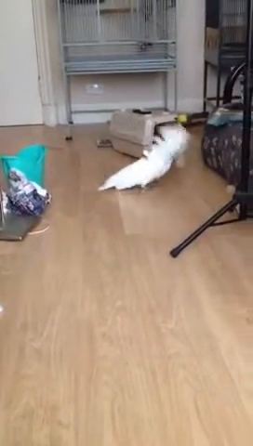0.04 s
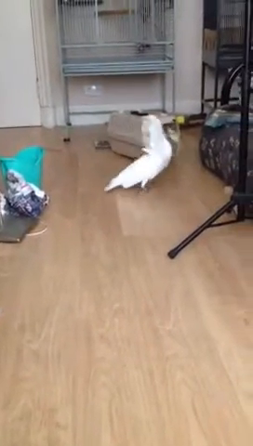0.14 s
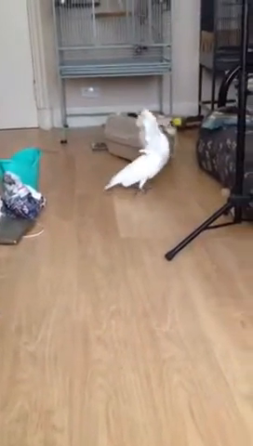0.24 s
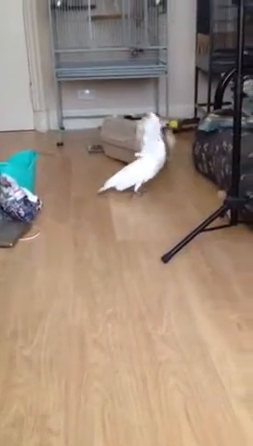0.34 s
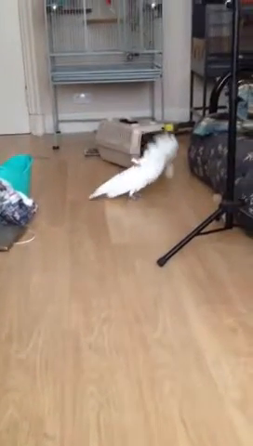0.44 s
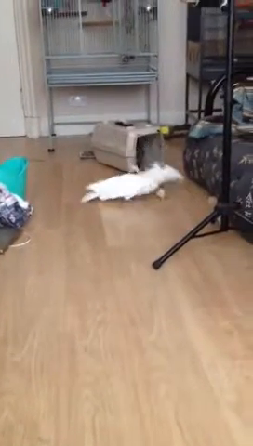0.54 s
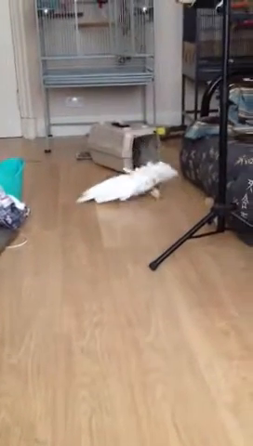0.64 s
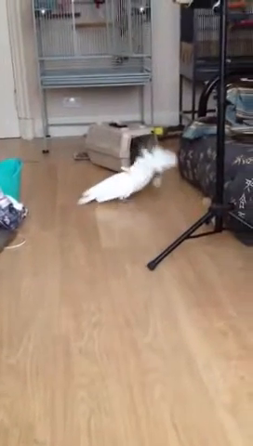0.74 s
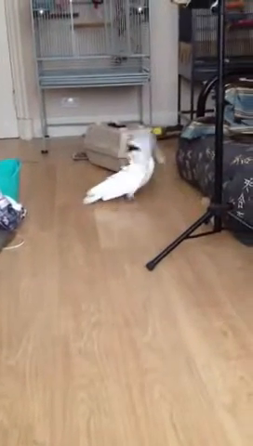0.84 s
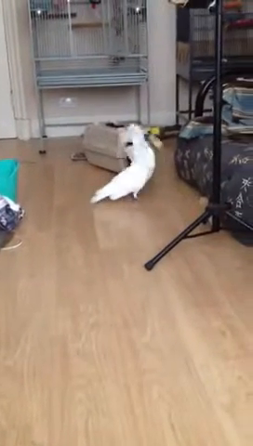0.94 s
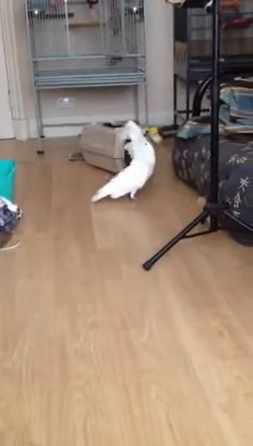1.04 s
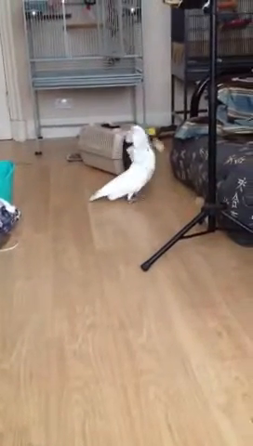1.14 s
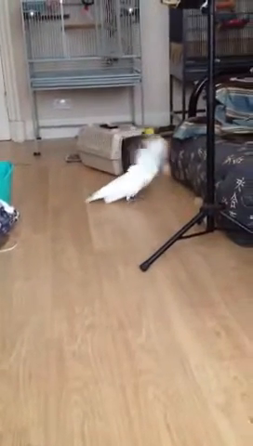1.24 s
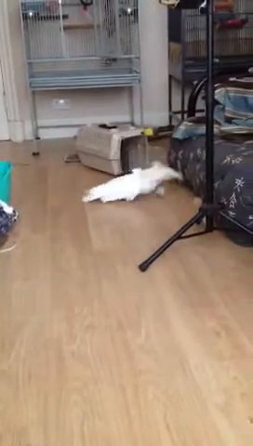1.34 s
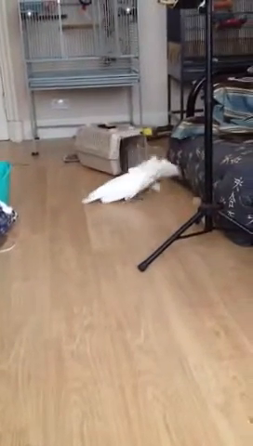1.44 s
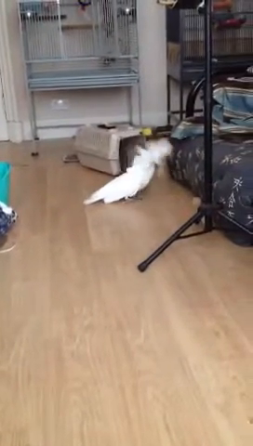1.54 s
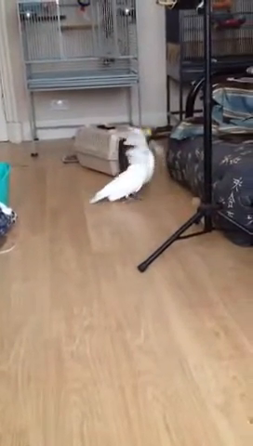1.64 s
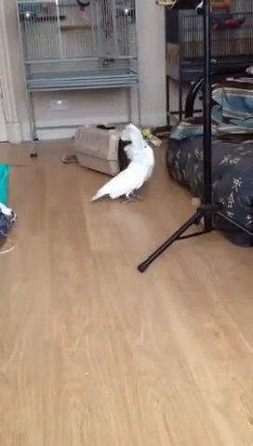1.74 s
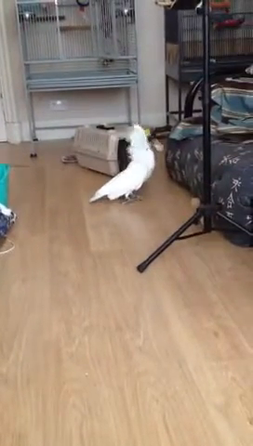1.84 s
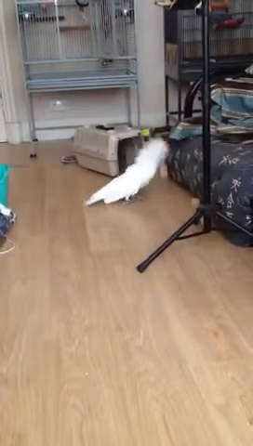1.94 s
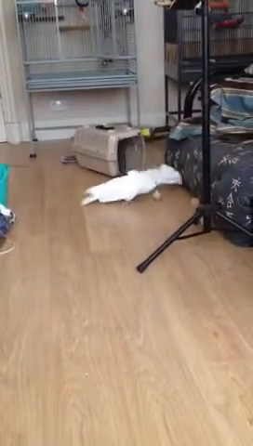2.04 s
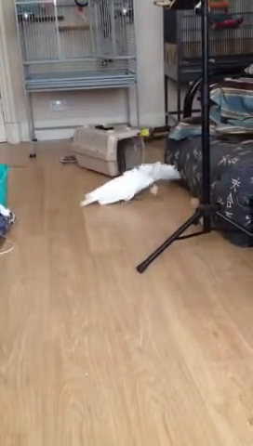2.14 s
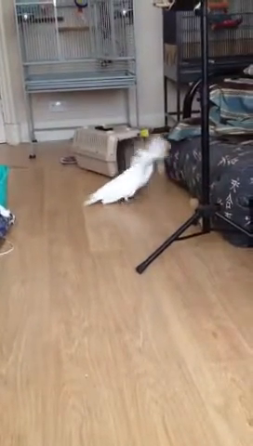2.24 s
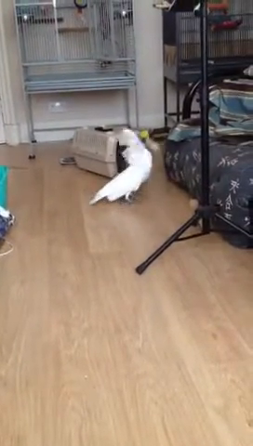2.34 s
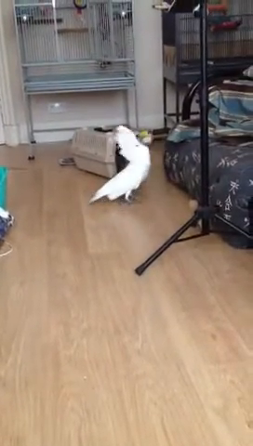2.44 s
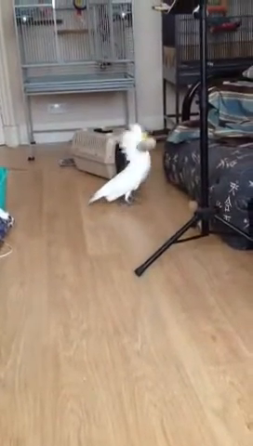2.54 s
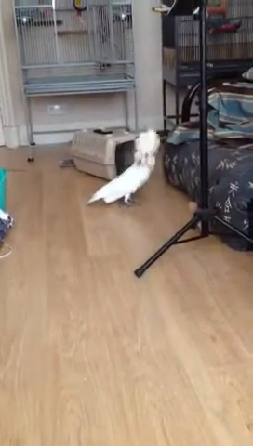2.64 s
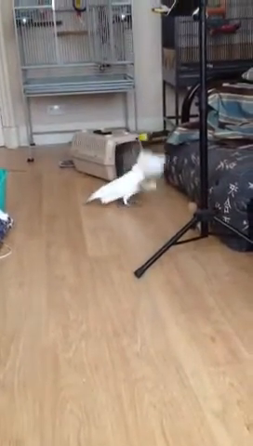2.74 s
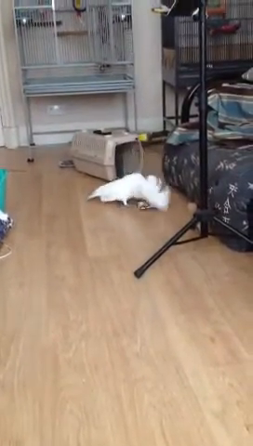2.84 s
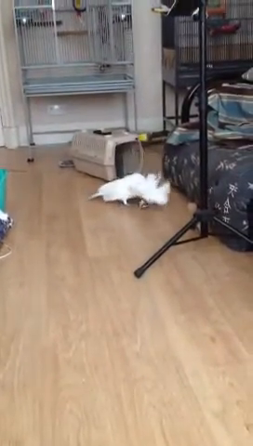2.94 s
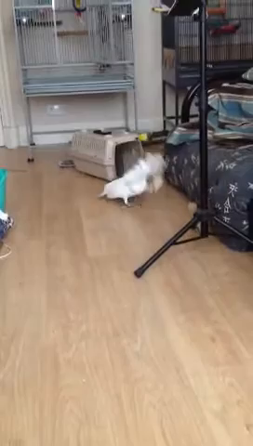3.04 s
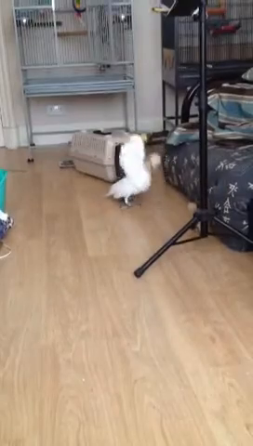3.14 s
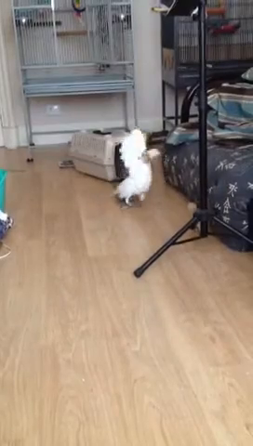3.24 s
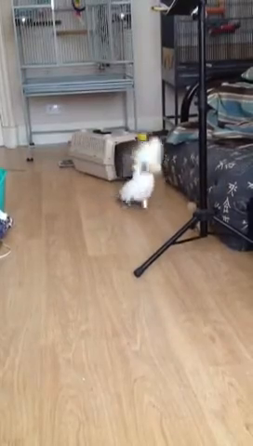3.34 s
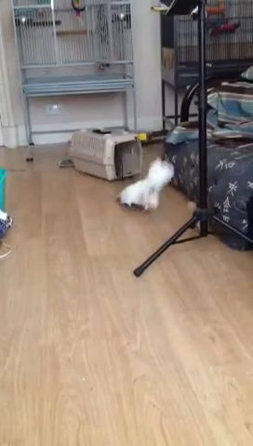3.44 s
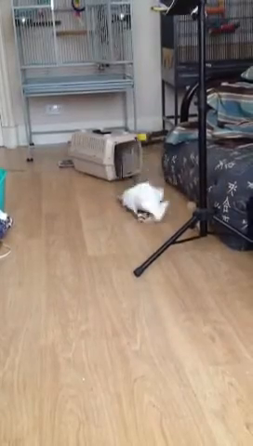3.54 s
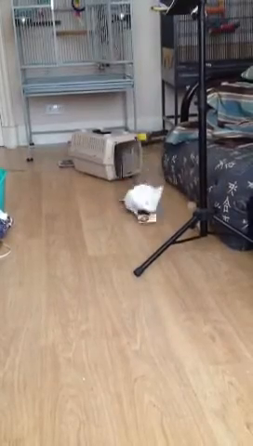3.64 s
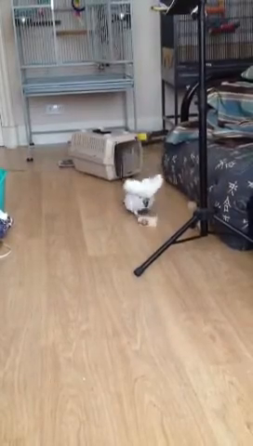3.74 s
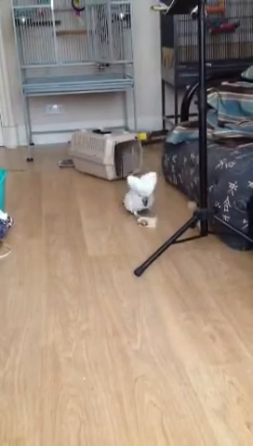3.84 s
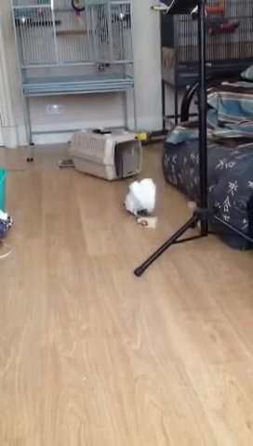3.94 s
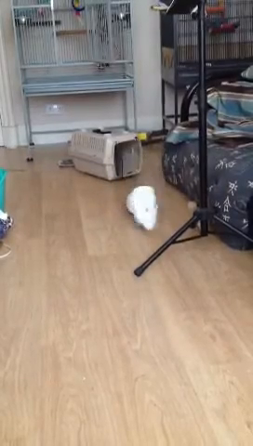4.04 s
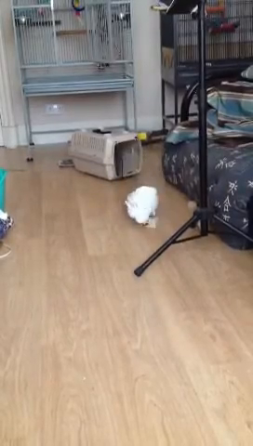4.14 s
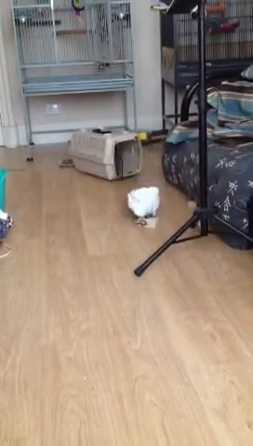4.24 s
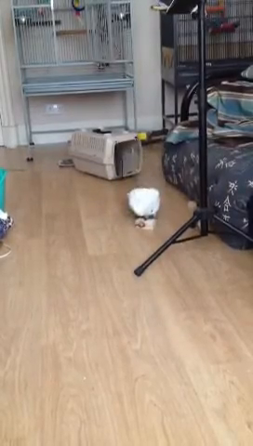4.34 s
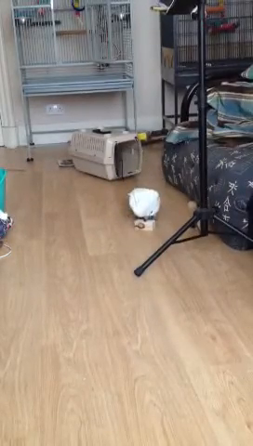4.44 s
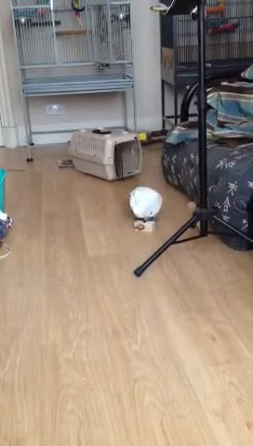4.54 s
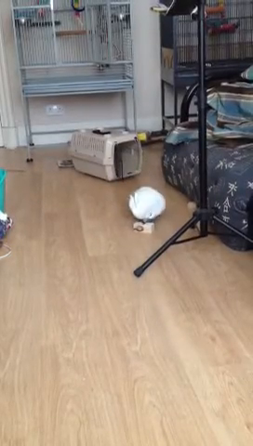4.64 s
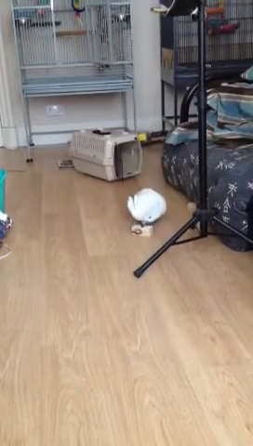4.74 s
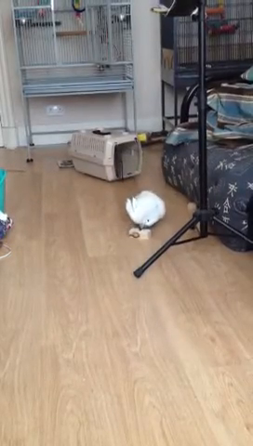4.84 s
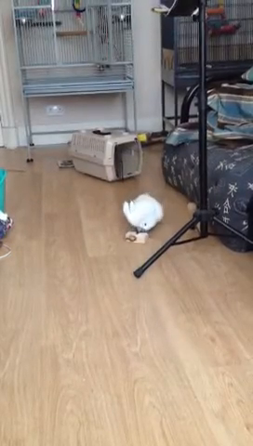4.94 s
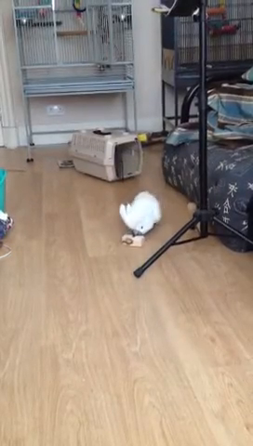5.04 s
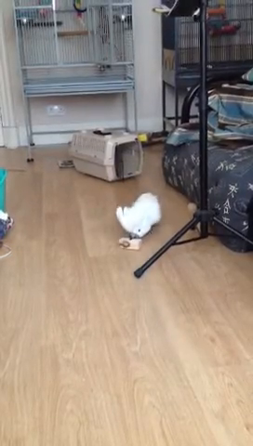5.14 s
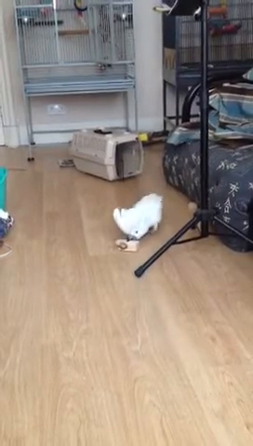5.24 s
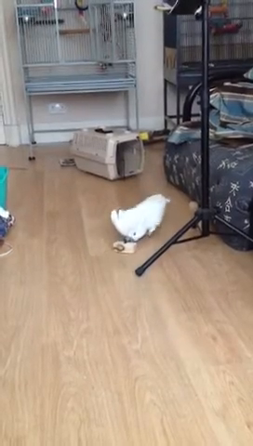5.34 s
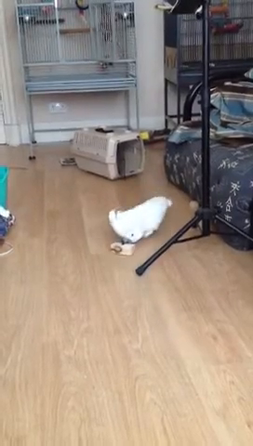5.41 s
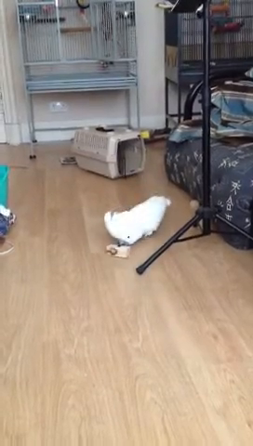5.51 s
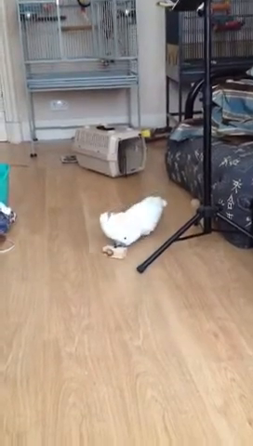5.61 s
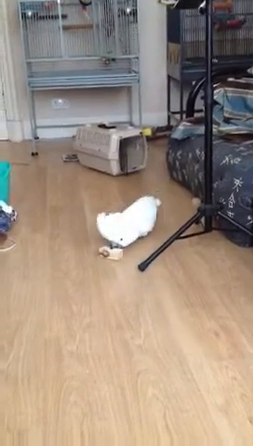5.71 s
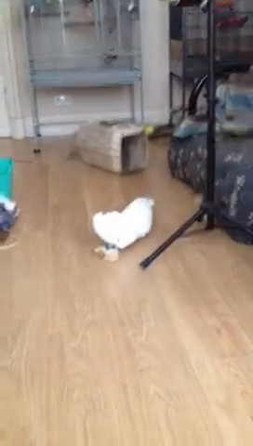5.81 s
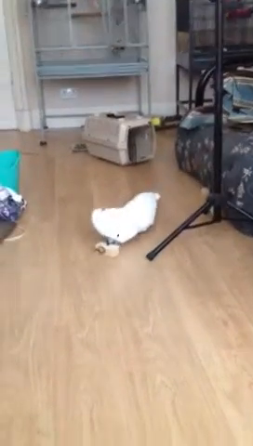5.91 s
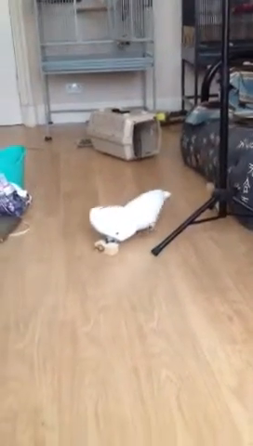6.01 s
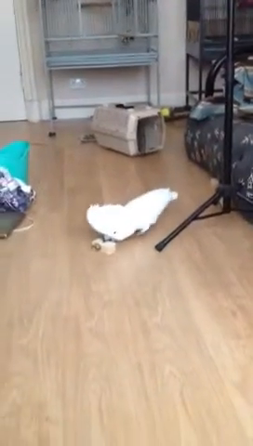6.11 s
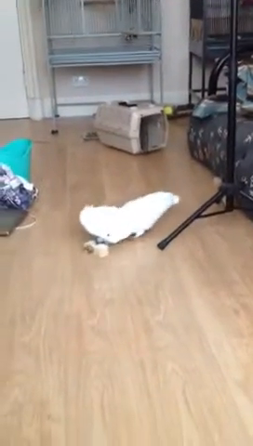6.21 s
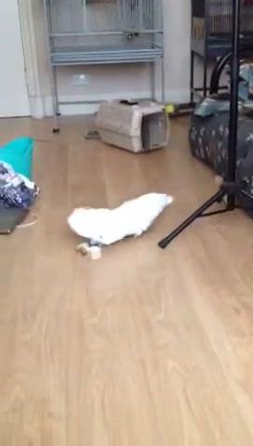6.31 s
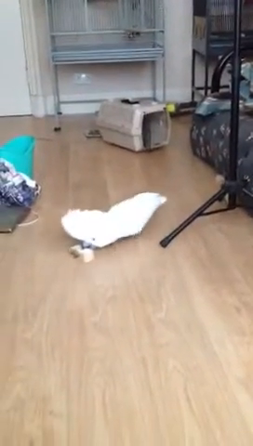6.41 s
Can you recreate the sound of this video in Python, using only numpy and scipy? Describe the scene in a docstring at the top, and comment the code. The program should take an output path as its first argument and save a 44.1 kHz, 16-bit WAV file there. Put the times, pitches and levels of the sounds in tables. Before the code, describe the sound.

A cockatoo bangs a wooden block on a wooden floor in hard spaced knocks, then soft squeals, faint whistles, scuffs and a low scraping rumble.

```python
"""Hard wooden knocks, six blows and then a tumble: a cockatoo bangs a toy block on a wooden floor, a few metres off.
Block and boards ring as damped resonances, with a noise crack that grows with the hardness of the contact.
Scuffs and ticks of claws and feathers (noise) run throughout; after the blows come soft squeals and whistles
(noise-modulated gliding tones), a soft foot thump, and low rumbles on the boards (stick-slip friction): a footfall,
then the block pushed along. A live room answers over a faint room tone."""
import sys
import numpy as np
from scipy import signal
from scipy.fft import rfft, irfft, next_fast_len
from scipy.io import wavfile
from scipy.ndimage import uniform_filter1d, map_coordinates

SR = 44100
rng = np.random.default_rng(int(sys.argv[2]) if len(sys.argv) > 2 else 0)


def file_out(sig):
    """Save sig as 16-bit WAV at sys.argv[1]."""
    # one column per channel
    cols = np.atleast_2d(sig).T
    # limit, then scale
    lim = np.clip(cols, -1, 1)
    pcm = np.round(lim * 32767).astype(np.int16)
    wavfile.write(sys.argv[1], SR, pcm)


N = 285327
TIME = np.arange(N) / SR

# Block meets floor, often edge first and face just after; the last row is a soft foot thump:
# (time [s], block ring gain [dB], floor thump gain [dB], contact corner [Hz], band favoured by the struck spot [Hz])
KNOCKS = [(0.002, 4, 3, 1590, 685), (0.519, 23.5, 19, 4180, 1192), (0.5227, 20, 16, 4370, 950),
          (1.3244, 22.5, 29, 3077, 2260), (2.0262, 21.5, 28, 1729, 914), (2.8453, 11.5, 18.5, 1791, 900),
          (2.8519, 19, 16, 1263, 472), (3.5245, 25.5, 22.5, 1154, 444), (3.5256, 19.5, 20, 4080, 2993),
          (3.7443, 14, 6, 1100, 674), (3.750, 10, 16, 3870, 3990), (3.828, -4.5, -7, 1500, 686),
          (4.044, -1.5, 5, 703.4, 299)]
# Resonances of the block: (frequency [Hz], width [Hz], gain [dB])
BLOCK_MODES = [(435.7, 71, -3.5), (643.2, 65, 4.5), (710.6, 92.3, 2), (845.4, 60, 3.5), (950.4, 23, 1.5),
               (1022.3, 28, 1), (1197.6, 97, 0.5), (1395, 73, -0.5), (1555.6, 53, 1.5), (1791, 99, -0.5),
               (2052, 160, -1.5), (2457, 210, -3), (3009, 240, -6), (3340.4, 130, -5), (3850, 110, -5.5)]
# Resonances of the floorboards: (frequency [Hz], width [Hz], gain [dB])
BOARD_MODES = [(112, 12, -29.5), (168.83, 15.38, 2), (216.5, 31, -5), (250.56, 16, 0), (292.9, 16, -1.5),
               (335.35, 20, -3), (370.7, 59, -10.5), (427, 61, -16), (570.1, 24, -8)]
# Colour of the crack of hard contact: (frequency [Hz], gain [dB])
CRACK_COLOUR = [(100, -19), (1000, 1.5), (3000, 3.5), (4400, 2), (5500, -4.5), (7200, -5.5), (9800, -17.5),
                (15000, -21)]
# Squeals that break from a high note to a low one:
# (time of the break [s], high note length [s], high note level before the room [dB], high note rasp [Hz])
SQUEALS = [(4.114, 0.15, -49, 478.5), (4.383, 0.085, -43, 242.4)]
# Gliding whistles: (start [s], length [s], first pitch [Hz], last pitch [Hz], level before the room [dB],
# rasp, half the width of the line [Hz])
WHISTLES = [(4.639, 0.1676, 1993, 4023, -52, 320.7), (4.93, 0.046, 4568, 4830, -57.5, 263.3),
            (5.015, 0.08, 3889, 3594, -51, 99.05), (5.103, 0.0812, 2803, 2737, -55.5, 147.9),
            (5.184, 0.095, 3006, 4400, -48, 300.6), (5.267, 0.12, 4544, 4353, -56.5, 80.8)]
# Low rumbles on the boards, a soft footfall, then the block pushed along:
# (start [s], length [s], level before bass cut and room [dB])
RUMBLES = [(4.294, 0.053, -56), (4.615, 0.821, -64.5), (5.534, 0.92, -53.5), (5.932, 0.301, -52.5)]
# What the rumbles stir: (frequency [Hz], width [Hz], gain [dB])
RUMBLE_MODES = [(174.2, 50, -0.5), (257, 21.4, 1), (316.2, 12, 5.5), (387.6, 35.3, 0.5), (633, 171, -9),
                (1090, 125, -25)]
# A corner of the block hums on the boards: (middle [s], half length [s], peak level before the room [dB])
CORNER_HUMS = [(5.44, 0.1215, -61.5), (6.46, 0.031, -54)]
# Resonances of that corner: (frequency [Hz], width [Hz], gain [dB])
CORNER_MODES = [(654.7, 73, 8), (780, 61, -16), (973, 123, -24.5)]
# Scuffs of claws and feathers: (start [s], length [s], level before filters and room [dB], top edge [Hz])
SCUFFS = [(0.81, 0.075, -41.5, 14100), (1.081, 0.0516, -52, 8960), (3.35, 0.274, -51, 10220),
          (3.924, 0.0477, -45, 11000), (4.648, 0.544, -52, 8830), (4.771, 0.1446, -48.5, 10960),
          (5.204, 0.19, -47.5, 11700), (5.54, 0.0675, -43, 14200), (5.661, 0.1596, -43, 6900),
          (5.933, 0.378, -51, 9860), (6.291, 0.0242, -38, 14000), (6.381, 0.0707, -39.5, 8700)]
# Sharp ticks of beak and claws: (time [s], gain before colouring [dB])
TICKS = [(0.286, -24.5), (0.301, -21), (3.348, -11), (3.361, -11.5), (4.819, -13), (5.231, -14.5),
         (6.032, -11), (6.321, -12.5)]
# Colour of scuffs and ticks: (frequency [Hz], gain [dB])
SCUFF_COLOUR = [(80, -36), (300, -14.5), (1000, -12), (2200, -10.5), (3600, -1.5), (5000, -1.5),
                (8300, -2.5), (9800, -10.5), (15000, -7.5)]
# Colour of the room tone: (frequency [Hz], relative level per Hz [dB])
TONE_COLOUR = [(50, -16.5), (100, -16.5), (160, -0.5), (310, -1.5), (450, -5.5), (1000, -10), (2200, -14.5),
               (4000, -16), (8000, -16.5), (10000, -25), (12500, -19.5), (15000, -17.5)]
# Decay of the room: (frequency [Hz], time to fall by 60 dB [s])
ROOM_T60 = [(150, 0.419), (400, 0.445), (900, 0.4733), (2000, 0.524), (5000, 0.5257), (12000, 0.27)]

SPOT_DB = 5.5  # how much the struck spot favours its band
CLICK_DB = -18  # push of the contact itself, relative to the block's ring gain
THUMP_LAG_S = 0.001502  # the boards give a moment after the contact
# crack relative to the block's ring gain at a middling contact corner, and its gain per octave of harder contact
CRACK_DB, MIDDLING_HZ, CRACK_DB_PER_OCTAVE = -21, 1996.6, 4.5

HIGH_NOTE_HZ, LOW_NOTE_HZ = 4708, 3701
LOW_NOTE_S, LOW_NOTE_DB, LOW_NOTE_RASP_HZ = 0.0653, -47.5, 260.1
SAG_HZ_PER_S = 2526  # average rate at which the low note sinks
NOTE_ATTACK_S, NOTE_RELEASE_S = 0.01545, 0.0276
EFFORT_DB_PER_OCTAVE = 15.5  # a note grows louder as it climbs
FRINGE_DB, FRINGE_WIDTH = -7, 2.6  # hiss around a note: relative level, width in rasp widths

RUMBLE_ATTACK_S, RUMBLE_RELEASE_S = 0.0335, 0.04
# slips a second, unevenness of their spacing (log scale), level against the fine grain
JUDDER_HZ, JUDDER_SCATTER, JUDDER_DB = 63.73, 0.045, -1.5

SCUFF_ATTACK_S, SCUFF_RELEASE_S = 0.032, 0.029
TONE_DB = -66.5


def knocks():
    """Each contact rings block and boards; a flat, soft one leaves out the upper modes and cracks less."""
    out = np.zeros(N)
    blow = signal.unit_impulse(SR)
    # the soft foot thump goes through the same resonances
    for s, block_db, floor_db, contact_hz, spot_hz in KNOCKS:
        block = undb(block_db) * edge(ring(blow, BLOCK_MODES), contact_hz, "low", order=3)
        # the spot that lands favours the modes that swing most there
        spot_mode = [(spot_hz, 0.24 * spot_hz, 0)]
        block = block + (undb(SPOT_DB) - 1) * ring(block, spot_mode)

        hardness_octaves = np.log2(contact_hz / MIDDLING_HZ)
        crack_db = block_db + CRACK_DB + CRACK_DB_PER_OCTAVE * hardness_octaves
        crack = undb(crack_db) * colour(snap(burst_db=-7, decay_s=0.003), CRACK_COLOUR)

        push = edge(blow, 1.104 * contact_hz, "low", order=3)
        click = undb(block_db + CLICK_DB) * edge(push, 1600, "high")
        boards = undb(floor_db) * edge(ring(blow, BOARD_MODES), 900, "low")

        add(out, s, click + crack + room(block, direct_db=-3.5))
        # the boards reach right up to the microphone, so more of their thump arrives directly
        add(out, s + THUMP_LAG_S, room(boards, direct_db=1.5))
    return out


def snap(burst_db, decay_s):
    """A gritty burst of contact noise straight from the spot, with the room's answer to a bare impulse."""
    burst = rng.standard_normal(SR) * np.exp(-TIME[:SR] / decay_s)
    direct = undb(burst_db) * burst / np.linalg.norm(burst)
    return direct + room(signal.unit_impulse(SR), direct_db=-17.5)


def wheeze(air_db=-13, air_hz=7500, air_width_hz=2000):
    """The bird squeals twice, high then low over a hiss of air, and goes on to whistle softly up and down."""
    out = sum(note(*whistle, overtone_db=-18.5) for whistle in WHISTLES)
    sunk_hz = LOW_NOTE_HZ - SAG_HZ_PER_S * LOW_NOTE_S
    air_mode = [(air_hz, air_width_hz, 0)]
    for s, length, db, rasp_hz in SQUEALS:
        out += note(s - length, length, HIGH_NOTE_HZ, HIGH_NOTE_HZ, db, rasp_hz, overtone_db=-12.5)
        out += note(s, LOW_NOTE_S, LOW_NOTE_HZ, sunk_hz, LOW_NOTE_DB, LOW_NOTE_RASP_HZ, overtone_db=-11.5)
        span, swell = envelope(s, LOW_NOTE_S, NOTE_ATTACK_S, NOTE_RELEASE_S)
        air = ring(ring(rng.standard_normal(len(span)), air_mode), air_mode)
        out[span] += undb(LOW_NOTE_DB + air_db) * swell * unit(air)
    return room(out, direct_db=-5.5)


def note(s, length, first_hz, last_hz, db, rasp_hz, overtone_db):
    """Air whistles in a narrow, gliding resonance, with a hissing fringe and a weak octave above it."""
    out = np.zeros(N)
    span, swell = envelope(s, length, NOTE_ATTACK_S, NOTE_RELEASE_S)
    t = TIME[span] - s
    hz = first_hz * (last_hz / first_hz) ** np.minimum(t / length, 1)
    effort_db = EFFORT_DB_PER_OCTAVE * np.log2(hz / np.sqrt(first_hz * last_hz))
    carrier = np.exp(2j * np.pi * np.cumsum(hz) / SR)
    fringe = undb(FRINGE_DB) * waver(t, FRINGE_WIDTH * rasp_hz)
    tone = carrier * (waver(t, rasp_hz) + fringe)
    # squaring the complex tone doubles its pitch
    overtone = edge(unit((tone ** 2).real), 7220, "low", order=4)
    out[span] = undb(db + effort_db) * swell * (unit(tone.real) + undb(overtone_db) * overtone)
    return out


def waver(t, rasp_hz):
    """Strength and phase that wander at the rasp rate, which widens a line into a band."""
    real, imag = (map_coordinates(rng.standard_normal(SR), [2 * rasp_hz * t], order=3) for _ in range(2))
    return real + 1j * imag


def rumbles():
    """Stick-slip friction rumbles in the boards, a footfall and then the pushed block; at times a corner hums."""
    force = np.zeros(N)
    for s, length, db in RUMBLES:
        span, swell = envelope(s, length, RUMBLE_ATTACK_S, RUMBLE_RELEASE_S)
        force[span] = np.hypot(force[span], undb(db) * swell)  # overlapping rumbles add in power
    friction = grains(N, spread_db=5.0) + undb(JUDDER_DB) * judder()
    rumble = force * unit(edge(ring(friction, RUMBLE_MODES), 3800, "low"))
    pressure = sum(undb(db) * np.exp(-((TIME - s) / half_length) ** 2) for s, half_length, db in CORNER_HUMS)
    corner = pressure * unit(ring(grains(N, spread_db=2), CORNER_MODES))
    return room(edge(rumble, 135, "high") + corner, direct_db=-3.0)


def judder():
    """Stick and slip: nearly even jerks of uneven strength."""
    spacing, strength = rng.standard_normal((N // 100, 2)).T
    times = np.cumsum(np.exp(JUDDER_SCATTER * spacing) / JUDDER_HZ)
    # strength scatters by 2.93 dB
    jerks = np.bincount((times * SR).astype(int), undb(2.93 * strength), N)[:N]
    return unit(jerks)


def scuffs():
    """Claws and feathers brush the floor in gritty swells, with sharp ticks of beak and claws."""
    brushing, ticking = np.zeros(N), np.zeros(N)
    for s, length, db, top_hz in SCUFFS:
        span, swell = envelope(s, length, SCUFF_ATTACK_S, SCUFF_RELEASE_S)
        grit = edge(grains(len(span), spread_db=4.5), top_hz, "low")
        brushing[span] += undb(db) * swell * grit
    for s, db in TICKS:
        add(ticking, s, undb(db) * snap(burst_db=-3.5, decay_s=0.0069))
    return colour(room(brushing, direct_db=-2) + ticking, SCUFF_COLOUR)


def grains(size, spread_db):
    """Friction: a dense run of tiny slips of uneven strength."""
    return unit(rng.standard_normal(size) * undb(spread_db * rng.standard_normal(size)))


def room_tone():
    """The faint, even tone of the room: steady coloured noise."""
    return undb(TONE_DB) * unit(colour(rng.standard_normal(N), TONE_COLOUR))


def room(x, direct_db, gap_s=0.0052, build_s=0.0015, sparse_s=0.078, echo_share=0.42):
    """Direct sound, a short gap, then single echoes thinning into a dense tail that decays band by band."""
    t = TIME[:SR]
    noise, chance = rng.standard_normal(SR), rng.random(SR)
    echoes = unit(np.sign(noise) * (chance < 1 / 100))  # one sample in a hundred, on average
    early = echo_share * np.exp(-t / sparse_s)
    field = np.sqrt(early) * echoes + np.sqrt(1 - early) * rng.standard_normal(SR)

    # overlapping bands, each with its own decay
    centres = np.log([hz for hz, _ in ROOM_T60])
    tail = np.zeros(SR)
    for band, (_, t60) in zip(np.eye(len(centres)), ROOM_T60):
        part = filtered(field, lambda hz: np.interp(np.log(hz + 1), centres, band))
        tail += part * np.exp(-np.log(1000) * t / t60)

    # the room's many modes average out to an even colour
    modes = rfft(tail, 2 * SR)
    tail = irfft(modes / np.sqrt(uniform_filter1d(np.abs(modes) ** 2, size=130)))[:SR]
    tail = np.r_[np.zeros(int(gap_s * SR)), tail * (1 - np.exp(-t / build_s))]
    reverberant = signal.fftconvolve(x, tail / np.linalg.norm(tail))[:len(x)]
    return undb(direct_db) * x + reverberant


def ring(x, modes):
    """Damped resonances; neighbours swing in opposite directions."""
    def response(hz):
        total = 0
        for k, (f, width, db) in enumerate(modes):
            damping = 1j * hz * width
            total = total + (-1) ** k * undb(db) * damping / (f ** 2 - hz ** 2 + damping)
        return total
    return filtered(x, response)


def colour(x, spectrum):
    """Shape x by (frequency [Hz], gain [dB]) points, causally (minimum phase), so that a click stays sharp."""
    def response(hz):
        cepstrum = irfft(np.log(undb(lookup(spectrum, hz))))
        half = len(cepstrum) // 2
        return np.exp(rfft(np.r_[cepstrum[0], 2 * cepstrum[1:half]], len(cepstrum)))
    return filtered(x, response)


def filtered(x, response):
    """Pass x through a response given as a function of frequency."""
    size = next_fast_len(2 * len(x), True)
    hz = np.arange(size // 2 + 1) * SR / size
    return irfft(rfft(x, size) * response(hz), size)[:len(x)]


def edge(x, hz, kind, order=2):
    """Butterworth low-pass or high-pass."""
    return signal.sosfilt(signal.butter(order, hz, kind, fs=SR, output="sos"), x)


def envelope(start, length, attack, release):
    """Rise, hold, and fall from the end of the length on: the samples that sound and their gain."""
    rise = np.clip((TIME - start) / attack, 0, 1)
    fall = np.clip(1 - (TIME - start - length) / release, 0, 1)
    gain = rise * fall
    span = np.flatnonzero(gain)
    return span, gain[span]


def lookup(table, hz):
    """Read (frequency [Hz], value) points on a log-frequency axis."""
    points, values = np.transpose(table)
    return np.interp(np.log(hz + 1), np.log(points), values)


def add(out, s, x):
    """Mix x into out from time s on."""
    start = int(s * SR)
    out[start:start + len(x)] += x[:N - start]


def undb(db):
    """Decibels to gain."""
    return 10 ** (np.asarray(db) / 20)


def unit(x):
    """Scale to rms 1."""
    return x / np.sqrt(np.mean(x ** 2))


def scene():
    """The bird and its toy over the faint, even tone of the room."""
    return (knocks() + wheeze() + rumbles() + scuffs() + room_tone())[None]


def record(dry):
    """The microphone thins the bass below 64 Hz and cuts the top steeply at 15450 Hz."""
    thin = edge(dry, 64, "high", order=3)
    # 0.2 dB of ripple below the cut, 70 dB down above it
    return signal.sosfilt(signal.ellip(10, 0.2, 70, 15450, fs=SR, output="sos"), thin)


dry = scene()
out = record(dry)
file_out(out)
```